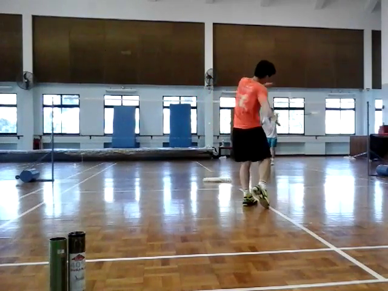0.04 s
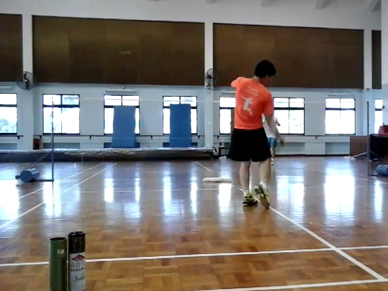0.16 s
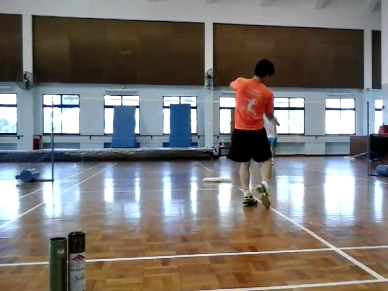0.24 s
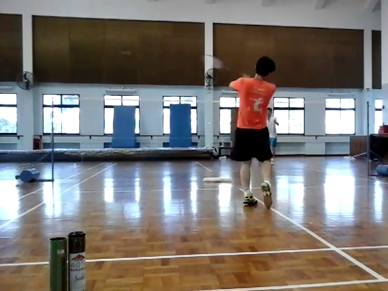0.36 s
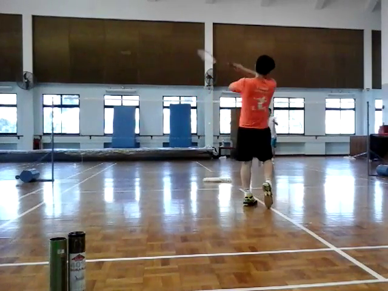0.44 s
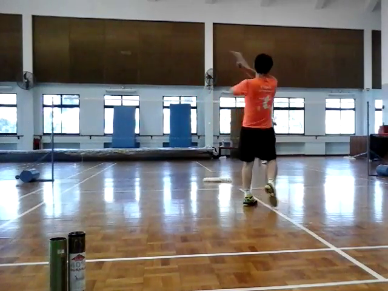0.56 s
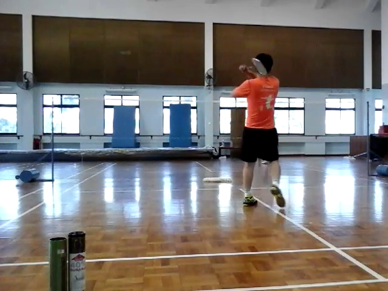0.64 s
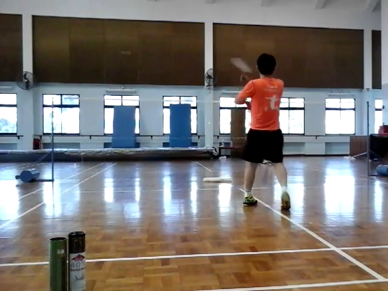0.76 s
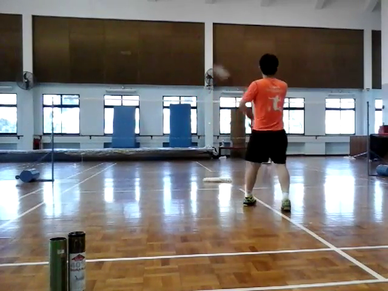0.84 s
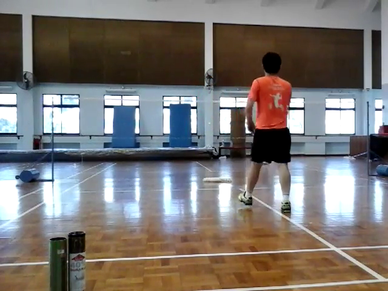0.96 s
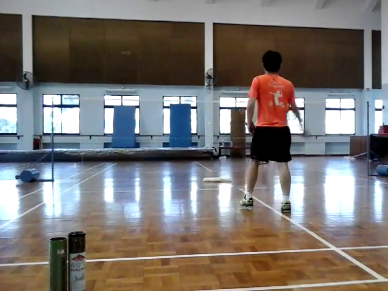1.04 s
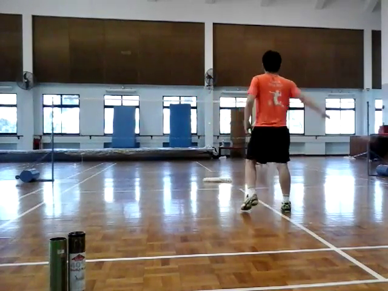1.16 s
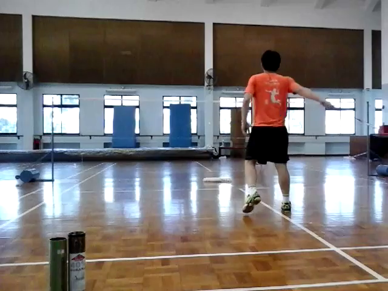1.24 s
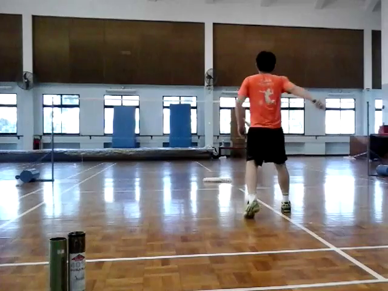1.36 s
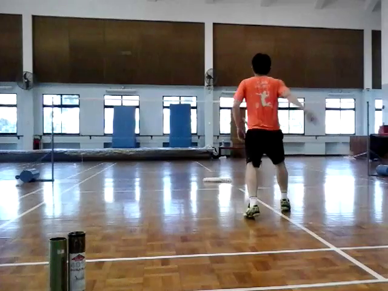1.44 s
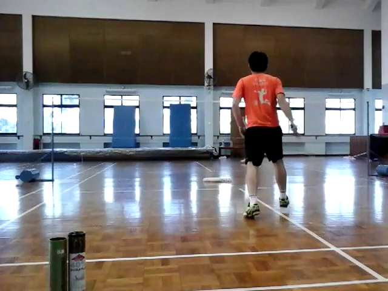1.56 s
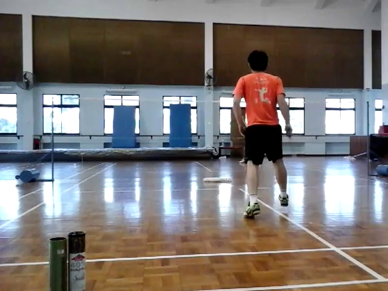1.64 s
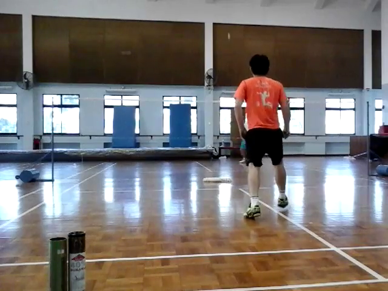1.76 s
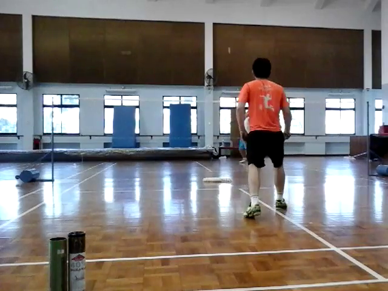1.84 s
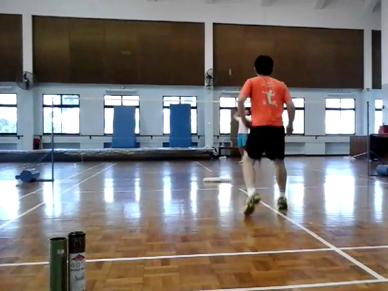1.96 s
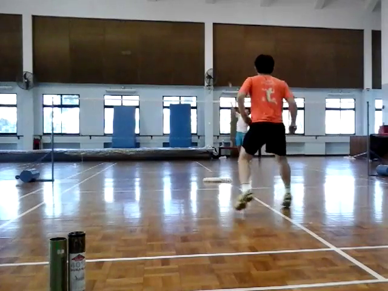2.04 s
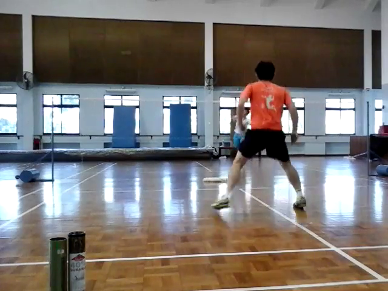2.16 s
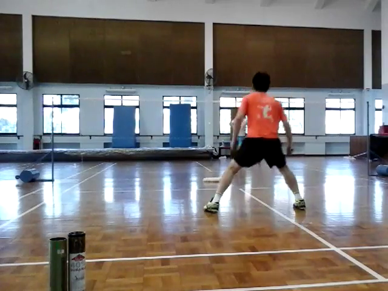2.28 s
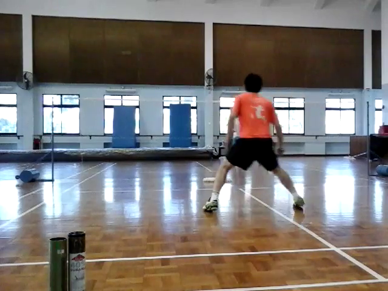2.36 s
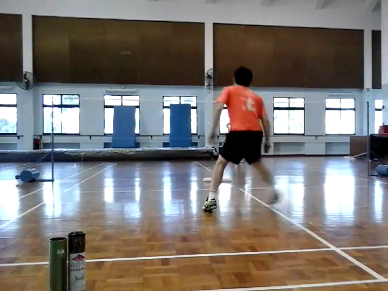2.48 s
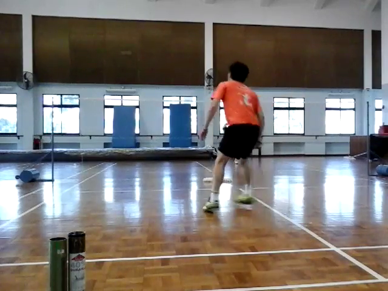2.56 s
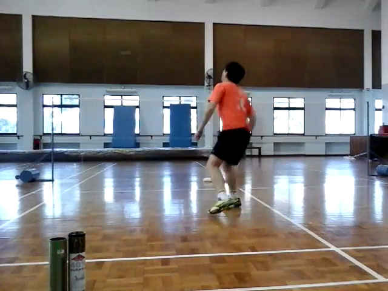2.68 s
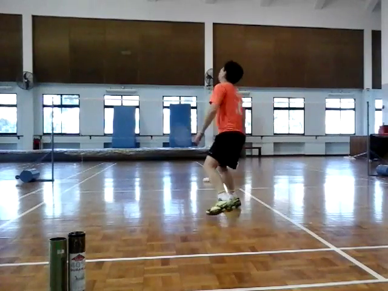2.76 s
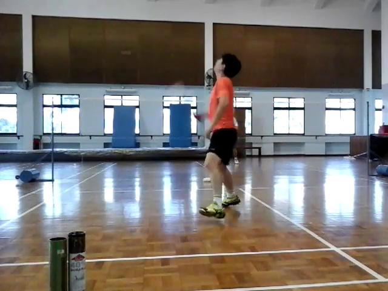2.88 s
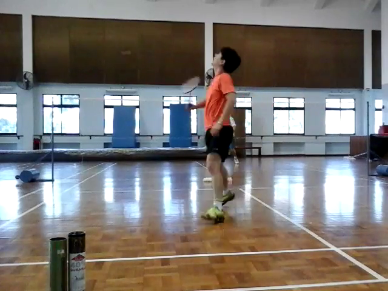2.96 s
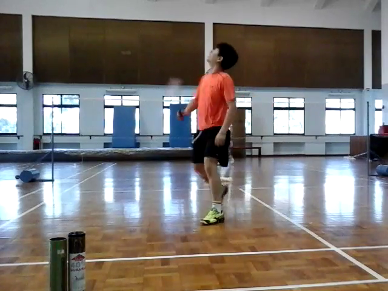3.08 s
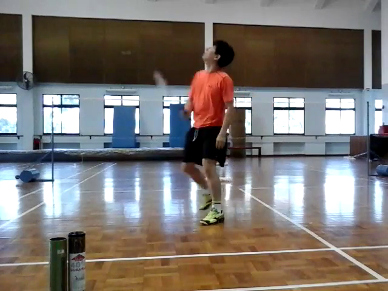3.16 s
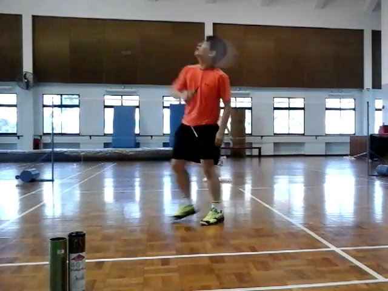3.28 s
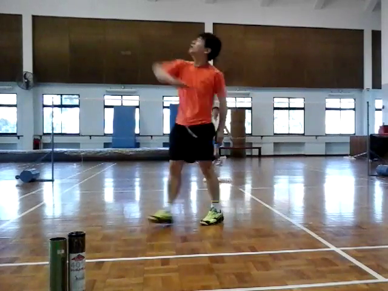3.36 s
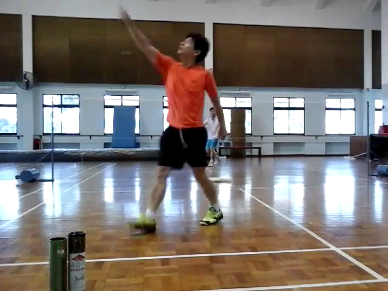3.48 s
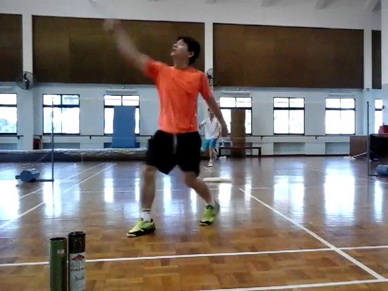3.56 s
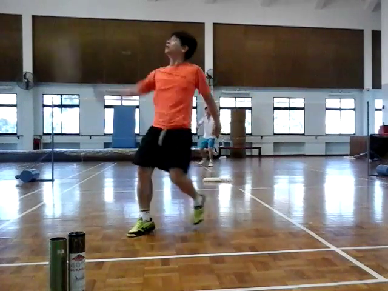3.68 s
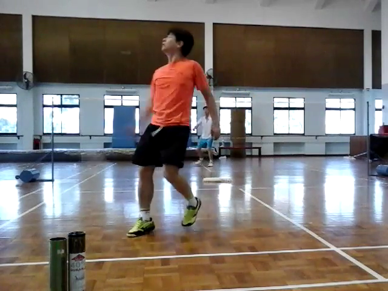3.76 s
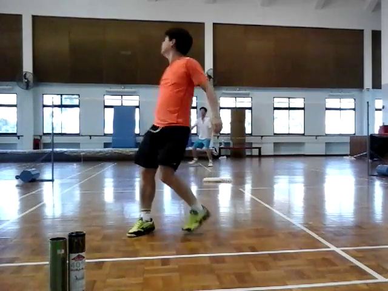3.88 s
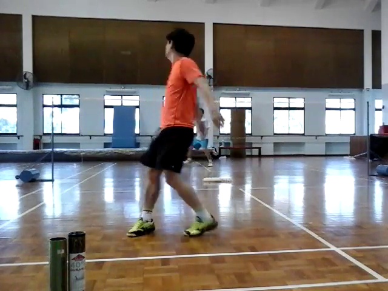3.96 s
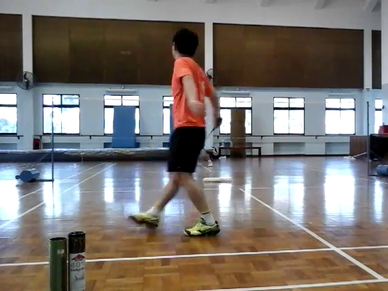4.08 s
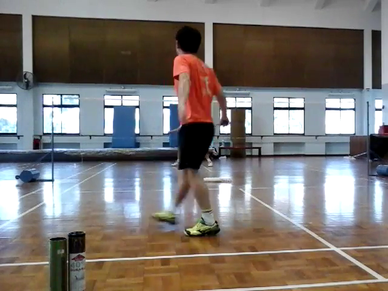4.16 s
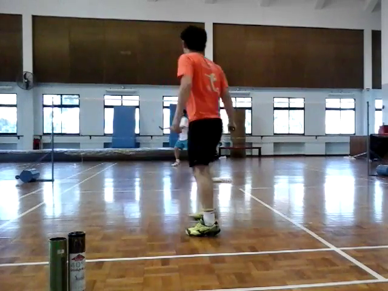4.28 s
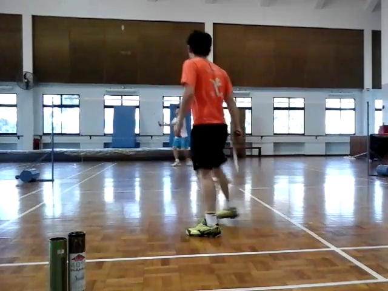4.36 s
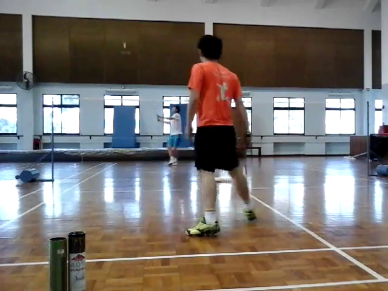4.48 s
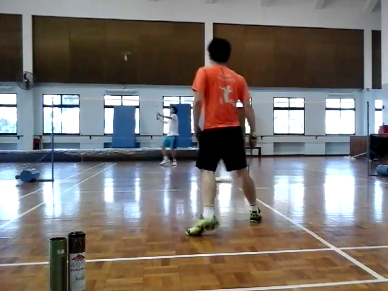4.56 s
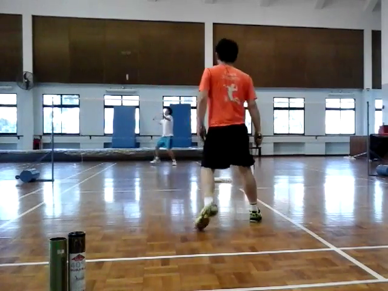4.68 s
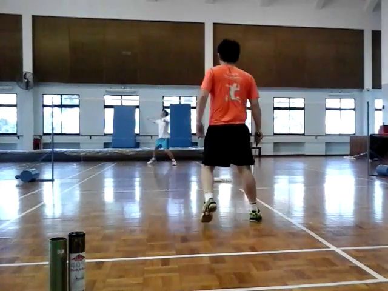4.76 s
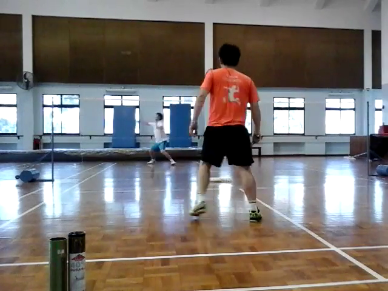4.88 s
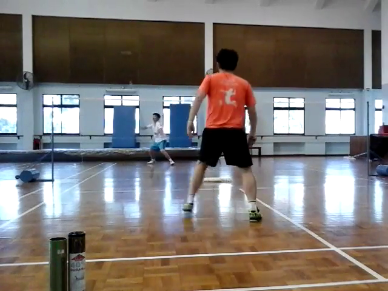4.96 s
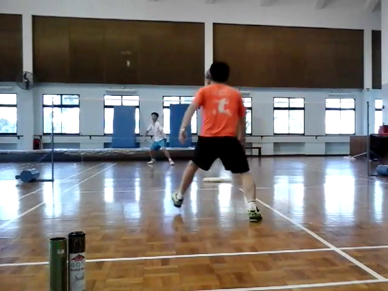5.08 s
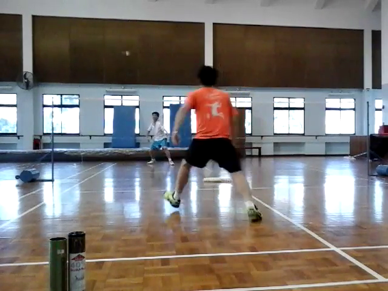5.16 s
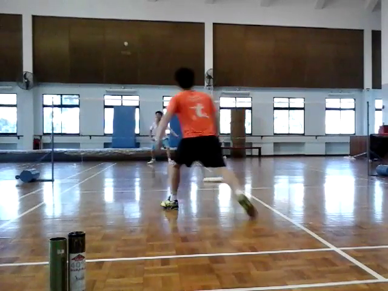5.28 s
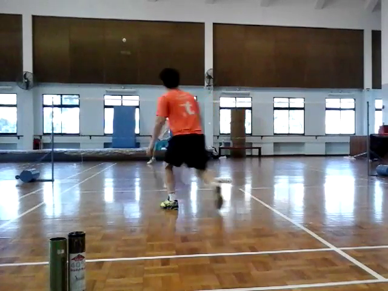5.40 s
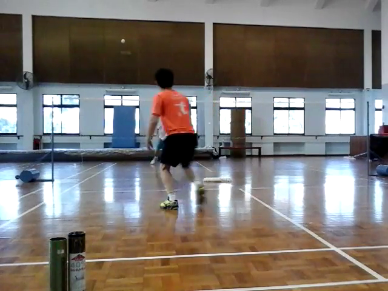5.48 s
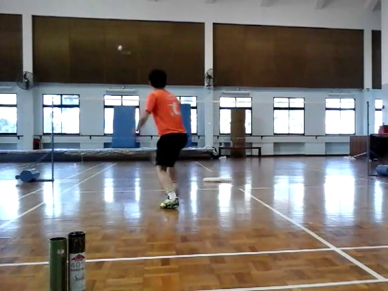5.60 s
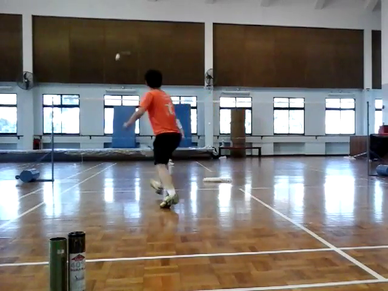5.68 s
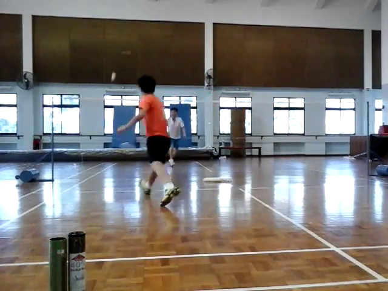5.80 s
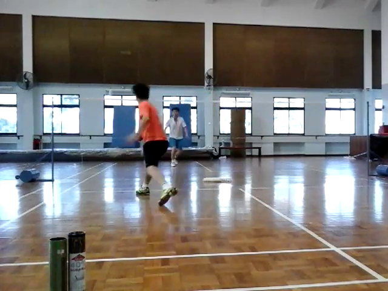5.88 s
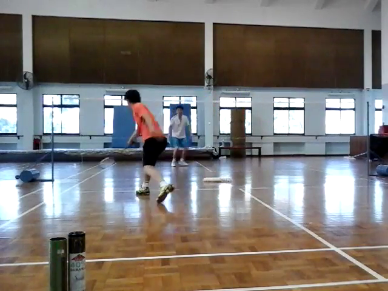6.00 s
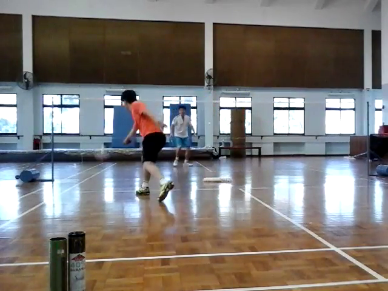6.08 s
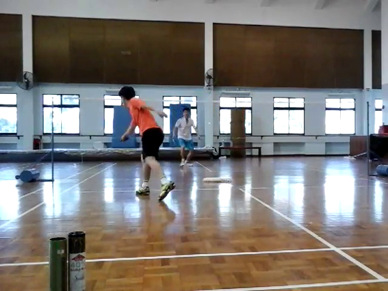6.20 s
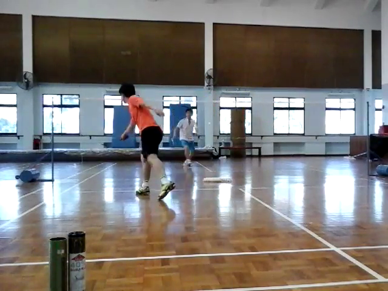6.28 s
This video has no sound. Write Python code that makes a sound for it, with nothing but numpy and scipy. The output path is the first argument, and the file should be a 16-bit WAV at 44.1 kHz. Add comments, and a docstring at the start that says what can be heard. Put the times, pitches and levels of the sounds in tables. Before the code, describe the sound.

Low ventilation rumble and hum fill a large hard sports hall. A racket cracks sharply against a shuttlecock, its echo lingering; a farther, ringing reply follows. Shoes stamp, scuff and squeak faintly, then the loudest, nearest smash bursts out. More footsteps and gritty ticks surround a much softer, more stringy final hit, and a short bright shoe chirp comes near the end. A small microphone near the floor gives a thin, piercing treble.

```python
"""Ventilation noise and low hums, then a racket crack at 0.36 s: a badminton rally in a large hard hall.
Four blows: noise bursts of milliseconds, repeated by floor, walls and roof, with a long reverberant tail.
Shoes stamp (dull noise puffs), scuff and tick (high hiss), and squeak (wavering harmonic tones).
The small microphone near the floor peaks at 7.1 kHz; its gain steps down after an overload and creeps back."""
import sys
import numpy as np
from scipy import signal
from scipy.fft import rfft, irfft
from scipy.io import wavfile
from scipy.ndimage import uniform_filter1d, map_coordinates

SR = 44100
rng = np.random.default_rng(int(sys.argv[2]) if len(sys.argv) > 2 else 0)


def dump_mix(stems):
    """Bounce the given channels to the path in sys.argv[1] as a 16-bit WAV at rate SR."""
    frames = np.atleast_2d(stems).T  # one column per channel
    limited = np.clip(frames, -1, 1)  # hard clip at full scale
    pcm = np.round(limited * 32767).astype(np.int16)
    wavfile.write(sys.argv[1], SR, pcm)


N = 279373

# racket blows: (time [s], level [dB], distance [m], delay off floor [s], near wall [s], roof [s], side wall [s],
#   frame gain at 450 Hz [dB], cork at 1.2 kHz [dB], feathers at 3 kHz [dB], strings [dB], swish level [dB])
BLOWS = [(0.3588, 6.5, 5.87, 0.0038, 0.0082, .0315, 0.025, 2.5, 7.5, 7, -80, -53),
         (2.186, 4.5, 13.5, 0.00086, 0.0082, 0.022, .033, 6, 1.5, 7, -62, -65),
         (3.6039, 11.5, 4.63, 0.002, 0.0072, 0.039, 0.034, 2, 4.5, 2, -79, -41),
         (4.9959, -7.5, 7.1, 0.0013, 0.0078, 0.023, 0.03, -9, 11.5, 9.5, -33.5, -63)]
# spectrum common to all cracks: (frequency [Hz], gain [dB])
CRACK_SPECTRUM = [(100, -31), (300, -2), (600, 0), (1500, -4.5), (2200, -8), (5000, -2), (10000, -2),
                  (15000, -6)]
# string bed modes: (frequency [Hz], level [dB], t60 [s])
STRING_MODES = [(1047, 2.5, 0.096), (1260, -16, 0.025), (1810, -3, 0.044)]
# feet landing on the sprung floor: (time [s], peak [dB], brightness [Hz], hall feed re direct [dB])
STAMPS = [(.96, -35.5, 196, -3), (2.086, -35, 293, -4), (2.70, -29.5, 198, -6), (2.738, -25, 1510, 4.5),
          (4.2918, -18.5, 1704, 7.5), (4.86, -33.5, 190, 9), (5.652, -46, 202, 10), (5.909, -32, 1090, 7),
          (5.957, -28.5, 1160, 3)]
# soles scraping: (time [s], length [s], level [dB], lowest frequency [Hz])
SCUFFS = [(0.942, 0.026, -45.5, 2870), (1.265, 0.11, -62.5, 3900), (1.462, 0.05, -53.5, 3950),
          (1.529, 0.0092, -48.5, 4900), (1.913, 0.029, -53, 4970), (2.019, 0.025, -41.5, 2370),
          (2.113, 0.014, -42.5, 4960), (2.729, 0.014, -41.5, 3700), (2.792, 0.19, -50, 4900),
          (4.06, 0.024, -42.5, 2010), (4.317, 0.054, -45, 3900), (4.537, 0.055, -53, 4800),
          (4.908, 0.06, -48, 2860), (5.245, 0.027, -50, 4520), (5.283, 0.019, -40, 3450),
          (5.31, 0.065, -43.5, 4600), (5.805, 0.03, -51, 3900), (5.951, 0.019, -40.5, 3670),
          (6.193, 0.028, -38, 2420)]
# a sole's edge catching once: (time [s], peak [dB], lowest frequency [Hz])
TICKS = [(2.0126, -23, 5970), (2.0162, -23, 4940), (2.0255, -25, 2300), (2.794, -26.5, 4900),
         (4.657, -31, 4430), (4.672, -32, 2040), (5.285, -34, 3430), (5.328, -25, 2970), (5.343, -29, 2350),
         (5.3613, -25.5, 3000), (5.38, -42, 4750), (5.263, -28, 5000), (5.8163, -30.5, 6000),
         (5.908, -35.5, 2520), (5.959, -26, 3480)]
# rubber sticking and slipping on varnish: (time [s], length [s], loudest at share of length [0-1],
#   start slip rate [Hz], end slip rate [Hz], level [dB], step per overtone [dB], hall feed re direct [dB])
SQUEAKS = [(.945, 0.06, .4, 1826, 1850, -57, -14, -4), (2.082, 0.012, .4, 1820, 1810, -47, -8, -2),
           (2.785, 0.022, .5, 1060, 1084, -52, 1.5, 6), (2.805, 0.27, .25, 1985, 1960, -56, 1, -1),
           (3.066, 0.08, .55, 5840, 5720, -52, -5, 1.5), (4.06, .014, .3, 3700, 3640, -43, -4, -4),
           (4.09, .02, .4, 2970, 2990, -51, -18, 0.5), (4.176, 0.033, .4, 2960, 2980, -60, -18, -3),
           (5.795, .012, .4, 2500, 2530, -54, -18, -3), (6.1915, 0.008, .72, 3950, 3430, -24, -1, 1)]
# what the sole radiates: (frequency [Hz], gain [dB])
SOLE_RADIATION = [(1000, -13), (3500, -1.5), (6000, 0), (9000, 0), (12000, -6.5), (16000, -60)]
# surface echoes of the shoes, by near wall, side wall and roof: (delay [s], gain [dB])
SHOE_ECHOES = [(.0097, -4.5), (0.0276, -8), (.031, -6)]
# hall decay: (frequency [Hz], t60 [s])
HALL_T60 = [(150, 0.41), (500, 1.45), (1400, 1.34), (3700, 1.205), (7000, 1.265), (12000, 0.8)]
# swell of the tail when the end wall answers: (frequency [Hz], added amplitude [dB])
END_WALL_SWELL = [(400, 1), (1200, -12), (3000, -16.5)]
# ventilation air noise shape: (frequency [Hz], relative level [dB])
AIR_SPECTRUM = [(20, -17.5), (50, -12.5), (100, -4.5), (170, -6), (250, -13), (500, -18), (1500, -30.5),
                (2500, -34), (5000, -40.5), (10000, -43.5), (15000, -29)]
# narrow fan hums: (frequency [Hz], rms [dB], drift rate [knots/s])
FAN_HUMS = [(139.3, -45, 9.9), (96, -52.5, 14)]
# microphone response: (frequency [Hz], gain [dB])
MICROPHONE = [(20, 0), (4500, 4), (5800, 7.5), (7100, 15.5), (8300, 7.5), (10500, 0.5), (14000, -7.5)]

SOUND_M_PER_S = 343
FLOOR_DB, WALL_DB, ROOF_DB, SIDE_DB = -0.5, 0.8, -1.5, -0.3  # surface returns, spreading aside
HALL_EVEN_M, BUILD_UP_S = 3.42, 0.0097  # distance where hall energy equals the direct crack; its build-up
END_WALL_M, END_WALL_LASTS_S = 22.7, 0.064
SWISH_S, SWISH_HZ = 0.056, 4500
SCUFF_TOP_SHARE, GRIT_DB = 0.12, 4.5  # loudest at this share of the length; lumpiness
WAVER_SHARE, STEADY_S = 0.03, 0.03  # pitch waver limit for the shortest squeak; halved at STEADY_S
TOP_HZ = 14000


def rackets():
    """Blows: swish of the head through air, then a crack with string ring, repeated by the surfaces."""
    out, t, swish_t = np.zeros(N), seconds(0.3), seconds(SWISH_S)
    ring = sum(amp(db - 60 * t / t60_s) * np.sin(2 * np.pi * hz * t) for hz, db, t60_s in STRING_MODES)
    for (time_s, db, metres, floor_s, wall_s, roof_s, side_s,
         frame_db, cork_db, feather_db, strings_db, swish_db) in BLOWS:
        end_wall_s = 2 * (END_WALL_M - metres) / SOUND_M_PER_S
        paths = metres / HALL_EVEN_M * hall(BUILD_UP_S, end_wall_s)
        arrivals = [(0, 0), (roof_s, ROOF_DB), (side_s, SIDE_DB)]
        for delay_s, loss_db in [(floor_s, FLOOR_DB), (wall_s, WALL_DB)]:
            # every path so far also goes by this surface
            arrivals = arrivals + [(at_s + delay_s, echo_db + loss_db) for at_s, echo_db in arrivals]
        for at_s, echo_db in arrivals:
            # each arrival is smeared; short paths keep a sharp front
            scatter = noise(len(t)) * amp(-60 * t / 0.01) * (1 - np.exp(-t / 0.0002))
            scatter[0] = 9 * np.exp(-at_s / 0.006)
            scatter /= np.linalg.norm(scatter)
            spreading = metres / (metres + SOUND_M_PER_S * at_s)
            add(paths, at_s, amp(echo_db) * spreading * scatter)
        racket_gains = [(450, frame_db), (1200, cork_db), (3000, feather_db), (5500, 0.0038)]
        crack = coloured(coloured(paths, CRACK_SPECTRUM), racket_gains)
        strings = amp(strings_db) * signal.fftconvolve(paths, ring)[:len(paths)]
        add(out, time_s, amp(db) * (crack + strings))
        swish = hiss(noise(len(swish_t)), SWISH_HZ) * swell(swish_t, SWISH_S, 0.8)
        add(out, time_s - SWISH_S - 0.011, amp(swish_db) * swish)
    return out


def stamps():
    """Landing feet: low noise puffs, shorter when brighter; rows are direct sound and hall feed."""
    out, t = np.zeros((2, N)), seconds(0.12)
    for time_s, db, hz, hall_db in STAMPS:
        puff = noise(len(t)) * amp(-60 * t * hz / 12) * (1 - np.exp(-t * hz))
        puff[1] = hz / 300  # one clean knock, stronger for a harder contact
        puff = coloured(puff, [(40, -25), (90, 0), (hz, -3), (hz * 4, -26), (hz * 16, -60)])
        add(out, time_s, amp([[db], [db + hall_db]]) * puff / np.abs(puff).max())
    return out


def squeaks():
    """Stick-slip: regular slips make a wavering tone with overtones; rows are direct sound and hall feed."""
    out = np.zeros((2, N))
    for time_s, length_s, top_share, hz, end_hz, db, step_db, hall_db in SQUEAKS:
        t = seconds(length_s)
        waver = WAVER_SHARE * STEADY_S / (STEADY_S + length_s)  # longer slides run steadier
        pitch_hz = np.linspace(hz, end_hz, len(t)) * (1 + waver * wobble(615, len(t)))
        phase = 2 * np.pi * np.cumsum(pitch_hz) / SR
        tone = np.zeros(len(t))
        for k in range(1, 7):
            if k * hz < SR / 3:
                tone += amp(step_db * (k - 1) + along(SOLE_RADIATION, k * hz)) * np.sin(k * phase)
        # over a long slide the sole bites unevenly
        grip = amp(6 * length_s / (STEADY_S + length_s) * wobble(232, len(t)))
        squeak = unit(grip * tone) * swell(t, length_s, top_share) ** 2
        add(out, time_s, amp([[db], [db + hall_db]]) * squeak)
    return out


def scuffs():
    """Friction: high noise made lumpy by grit."""
    out = np.zeros(N)
    for time_s, length_s, db, hz in SCUFFS:
        t = seconds(length_s)
        lumps = amp(GRIT_DB * wobble(445, len(t)))
        scuff = hiss(lumps * noise(len(t)), hz) * swell(t, length_s, SCUFF_TOP_SHARE)
        add(out, time_s, amp(db) * scuff)
    return out


def ticks():
    """A sole's edge catches once: brief hiss plus a ring at its lowest note."""
    out, t = np.zeros(N), seconds(0.01)
    for time_s, db, hz in TICKS:
        tick = hiss(noise(len(t)), hz) + 1.06 * np.sin(2 * np.pi * hz * t)
        tick *= amp(-60 * t / 0.0068)
        add(out, time_s, amp(db) * tick / np.abs(tick).max())
    return out


def hall(rise_s, wall_s):
    """Reverberation of energy 1: builds up, swells when the end wall answers, decays by band."""
    t = seconds(1.6)
    hz, frame_s, z = signal.stft(rng.standard_normal(len(t)), SR, nperseg=256)
    z = z * amp(-60 * frame_s / along(HALL_T60, hz)[:, None])
    answer = np.exp(-(2 * (frame_s - wall_s) / END_WALL_LASTS_S - 1) ** 4)
    z = z * (1 + amp(along(END_WALL_SWELL, hz))[:, None] * answer)
    tail = signal.istft(z, SR, nperseg=256)[1][:len(t)]
    tail *= 1 - np.exp(-(t / rise_s) ** 2)
    return tail / np.linalg.norm(tail)


def ventilation():
    """Broad air noise that drifts a little, plus fan hums of drifting amplitude and phase."""
    air = unit(coloured(rng.standard_normal(N), AIR_SPECTRUM))
    out = air * amp(-39 + 0.4 * wobble(1.196, N))
    t = np.arange(N) / SR
    for hz, db, knots_per_s in FAN_HUMS:
        drift = 1 + wobble(knots_per_s, N) + 1j * wobble(knots_per_s, N)
        out += amp(db) * unit(np.real(drift * np.exp(2j * np.pi * hz * t)))
    return out


def amp(db):
    """dB to amplitude."""
    return 10 ** (np.asarray(db) / 20)


def unit(x):
    """Scales to rms 1."""
    return x / np.sqrt(np.mean(x ** 2) + 1e-20)


def along(points, hz):
    """Interpolates (frequency [Hz], value) points on a log frequency axis."""
    f, v = np.transpose(points)
    return np.interp(np.log(hz + 1), np.log(f + 1), v)


def seconds(length_s):
    """Time axis [s]."""
    return np.arange(round(length_s * SR)) / SR


def wobble(knots_per_s, size):
    """Smooth random curve through normally distributed knots."""
    knots = rng.standard_normal(400)
    return map_coordinates(knots, [np.arange(size) * knots_per_s / SR], mode="wrap")


def noise(size):
    """White noise, at most 0.5 s."""
    return rng.standard_normal(SR // 2)[:size]


def coloured(x, points):
    """Causal minimum-phase filter with the gain of the (frequency [Hz], gain [dB]) points."""
    size = 8192
    cepstrum = irfft(np.log(amp(along(points, np.fft.rfftfreq(size, 1 / SR)))))
    cepstrum[1:size // 2] *= 2  # fold onto positive time
    cepstrum[size // 2 + 1:] = 0
    return signal.fftconvolve(x, irfft(np.exp(rfft(cepstrum))))[:len(x)]


def hiss(x, hz):
    """Keeps mainly the treble above hz, rms 1."""
    return unit(coloured(x, [(hz / 2, -24), (hz, 0), (8000, -2), (14000, -12)]))


def swell(t, length_s, top_share):
    """Rises from nothing, peaks at top_share of the length and fades."""
    skew = np.log(0.5) / np.log(np.clip(top_share, 0.05, 0.9))
    return np.sin(np.pi * (t / length_s) ** skew) ** 0.29


def add(track, time_s, x):
    """Mixes x into the track from time_s."""
    part = track[..., round(time_s * SR):][..., :x.shape[-1]]
    part += x[..., :part.shape[-1]]


def scene():
    """Sums rackets, shoes with hall and surface echoes, and ventilation."""
    scrapes = (scuffs() + ticks()) * amp([[0], [-4]])  # direct, hall feed
    direct, hall_feed = stamps() + squeaks() + scrapes
    shoe_hall = signal.fftconvolve(hall_feed, hall(0.0018, 0.088))[:N]
    out = rackets() + direct + shoe_hall + ventilation()
    for delay_s, db in SHOE_ECHOES:
        add(out, delay_s, amp(db) * direct)
    return out[None]


def record(dry):
    """Microphone colour, delayed gain control, clipping, band limit."""
    x = coloured(dry[0], MICROPHONE)
    level_db = 10 * np.log10(np.abs(uniform_filter1d(x ** 2, size=220)) + 1e-12)
    creep_db = 9.9 * np.arange(N) / SR  # recovery at 9.9 dB/s
    cut_db = np.clip(8 * (level_db + 8.5), 0, 8)
    cut_db[0] = 3  # starts turned down
    cut_db = np.maximum.accumulate(cut_db + creep_db) - creep_db
    cut_db = np.clip(cut_db, 0, 4.6)  # the deepest step, held a while
    late_cut_db = np.pad(cut_db, (round(0.14 * SR), 0), "edge")[:N]  # the control answers late
    x = np.clip(x * amp(-uniform_filter1d(late_cut_db, size=4000)), -1, 1)
    low_pass = signal.ellip(10, 0.3, 70, TOP_HZ, fs=SR, output="sos")
    return signal.sosfilt(low_pass, x)[None]


dry = scene()
out = record(dry)
dump_mix(out)
```